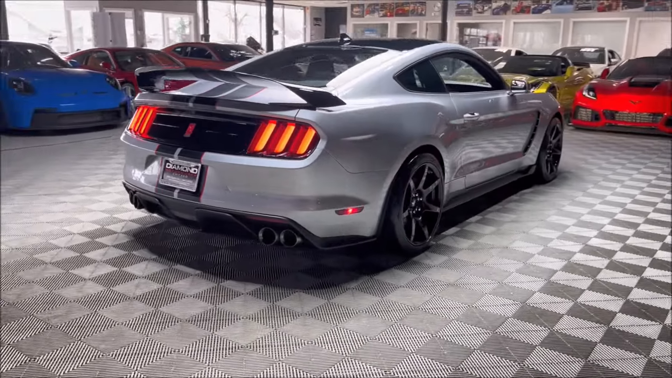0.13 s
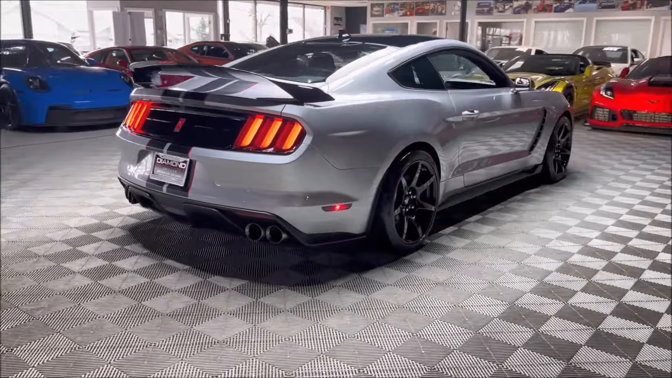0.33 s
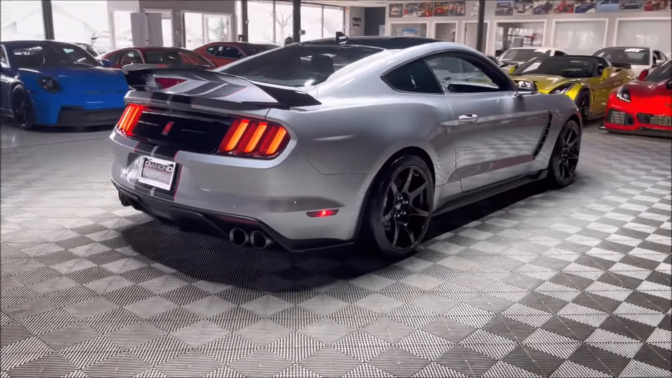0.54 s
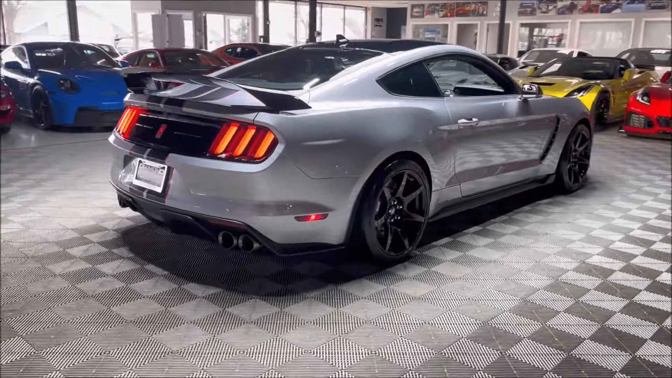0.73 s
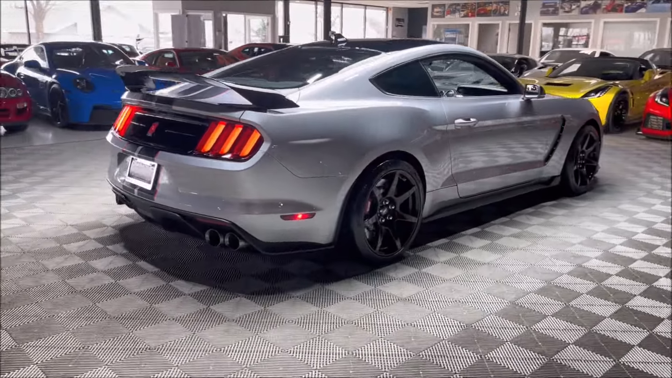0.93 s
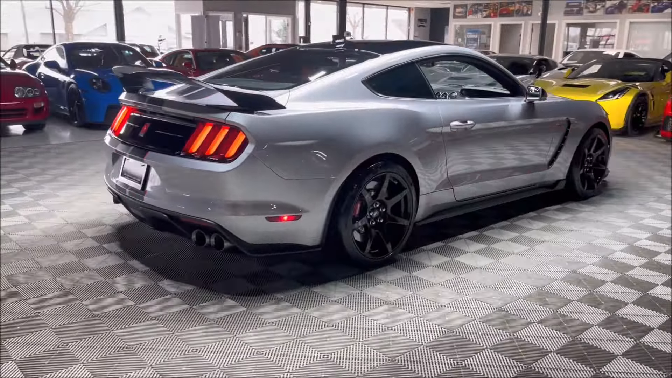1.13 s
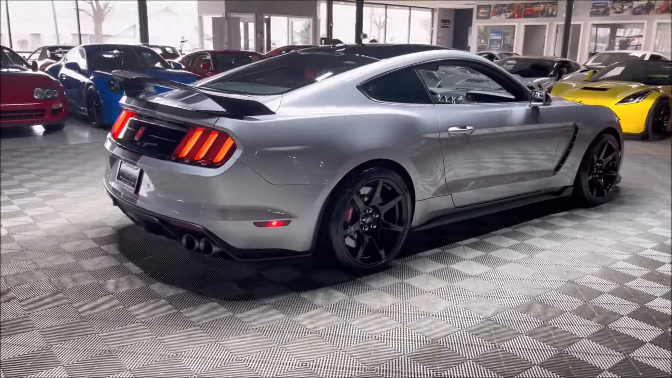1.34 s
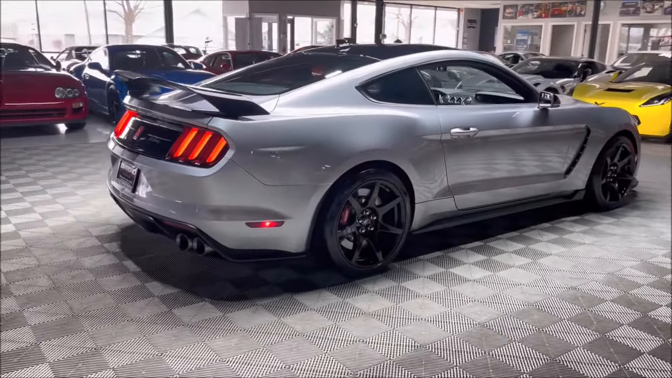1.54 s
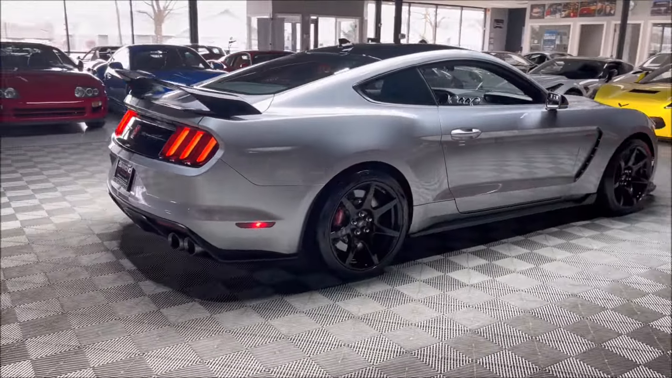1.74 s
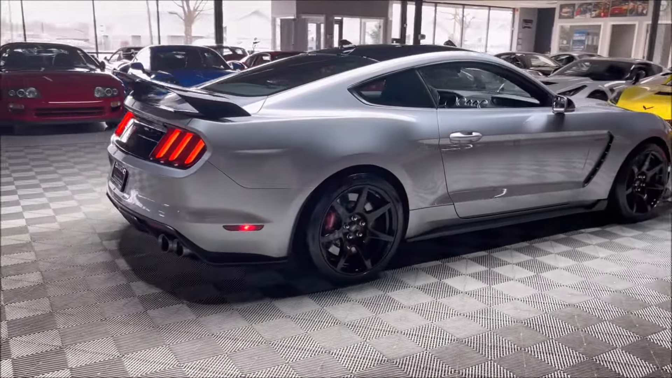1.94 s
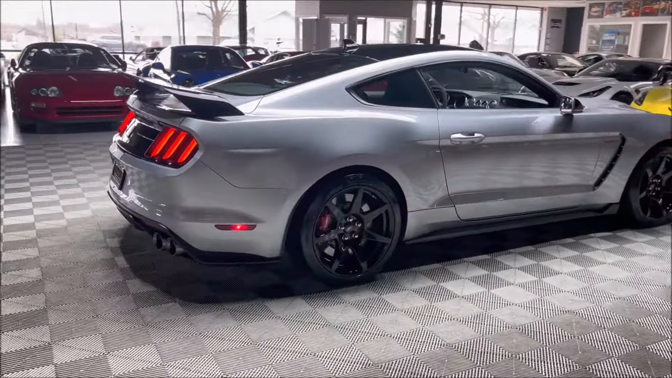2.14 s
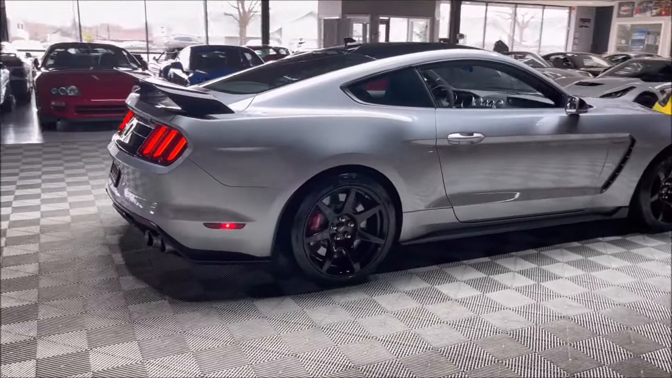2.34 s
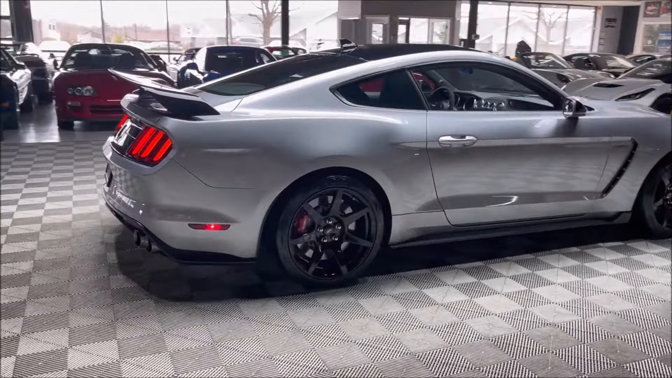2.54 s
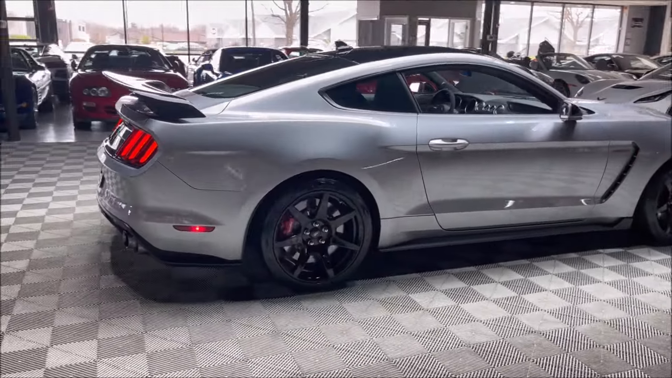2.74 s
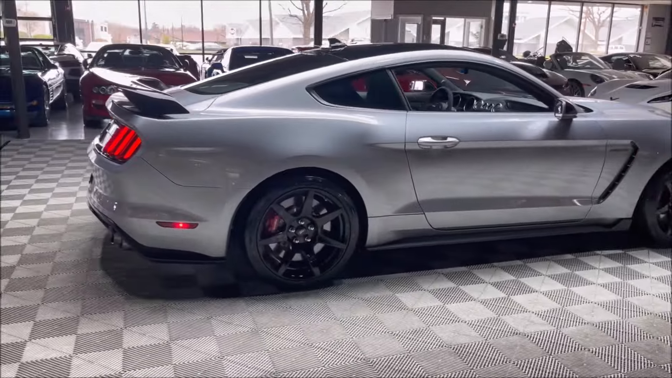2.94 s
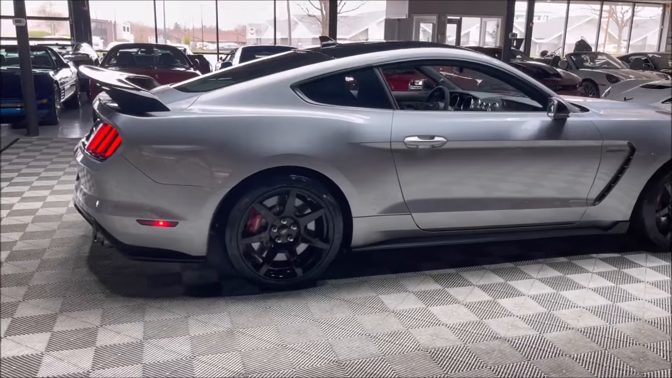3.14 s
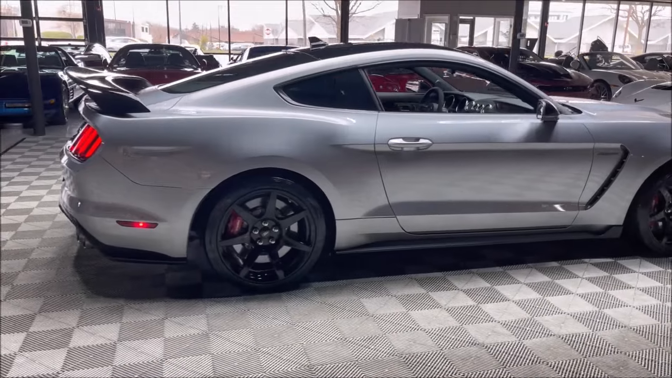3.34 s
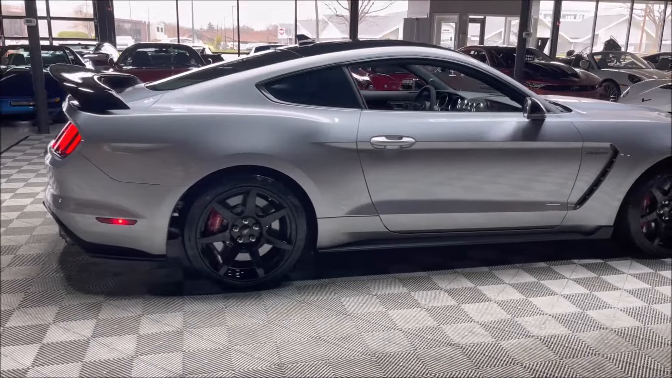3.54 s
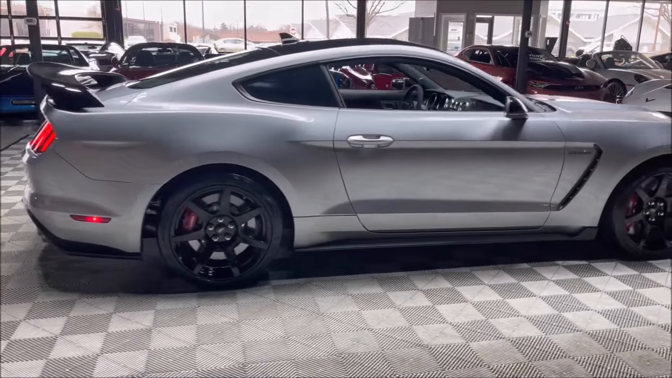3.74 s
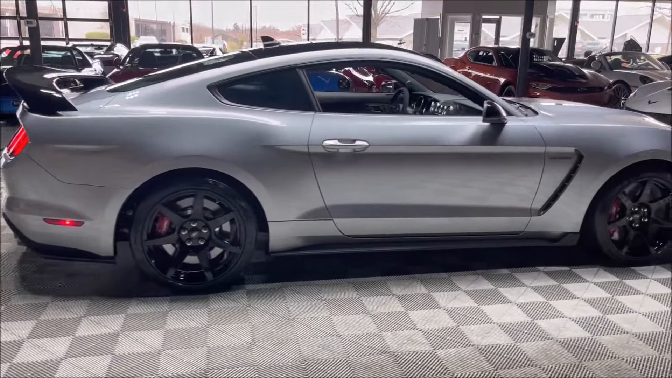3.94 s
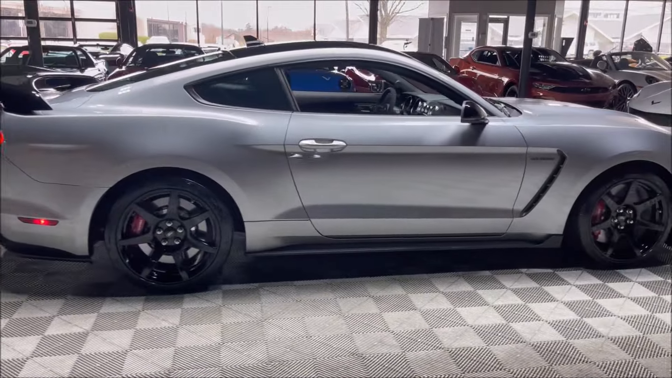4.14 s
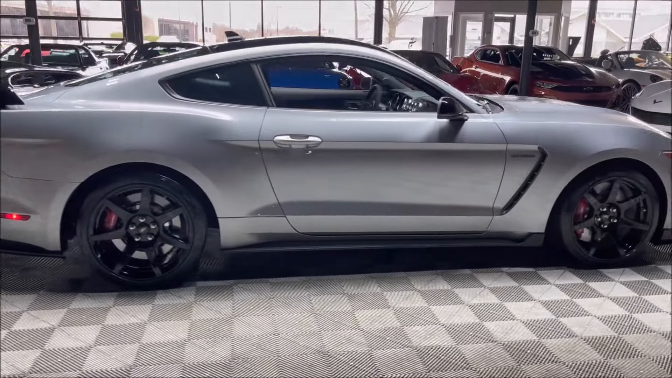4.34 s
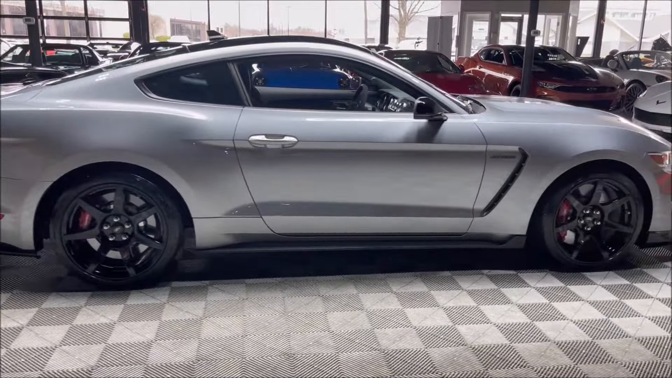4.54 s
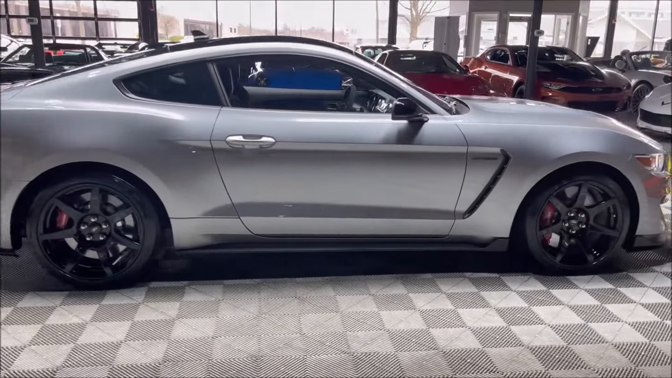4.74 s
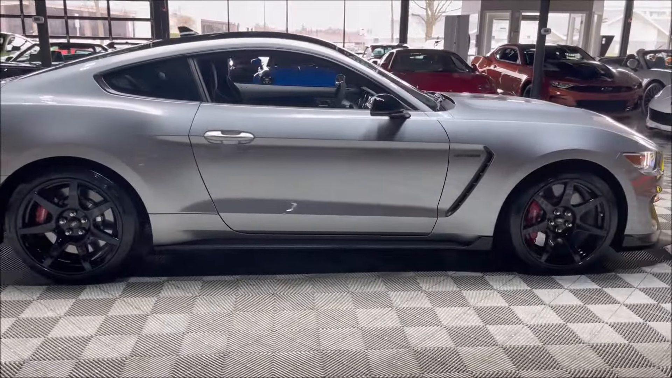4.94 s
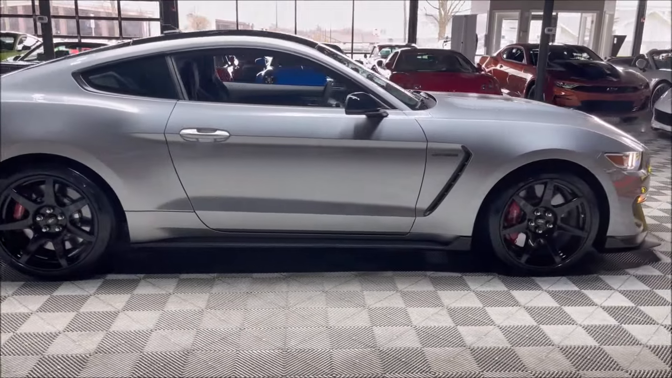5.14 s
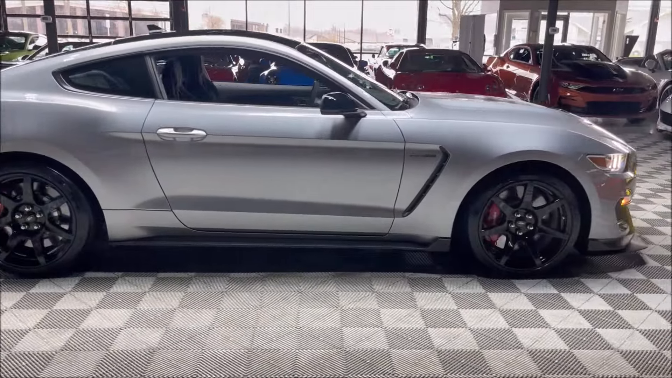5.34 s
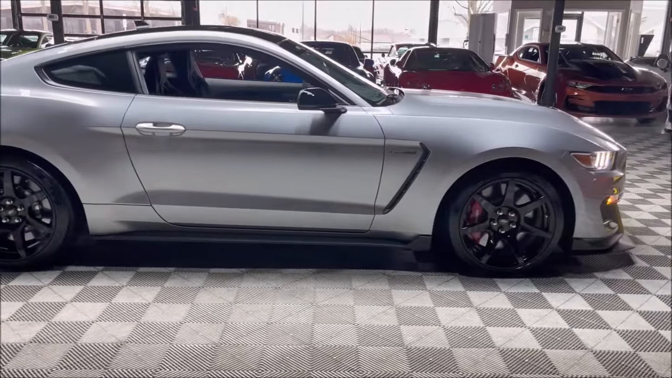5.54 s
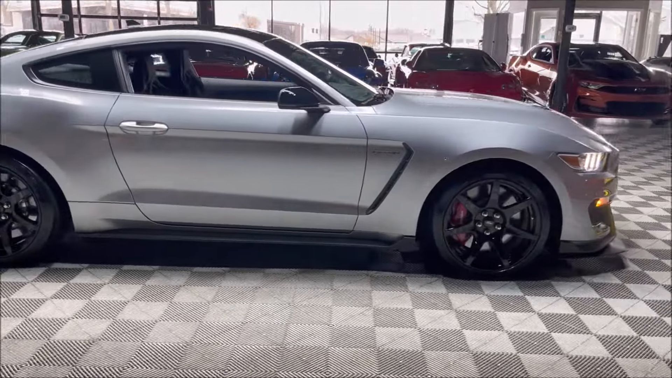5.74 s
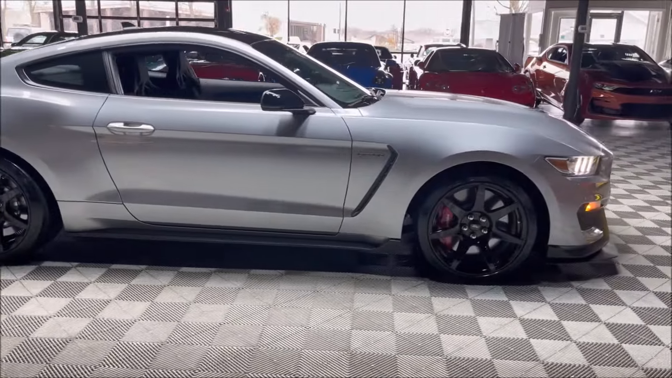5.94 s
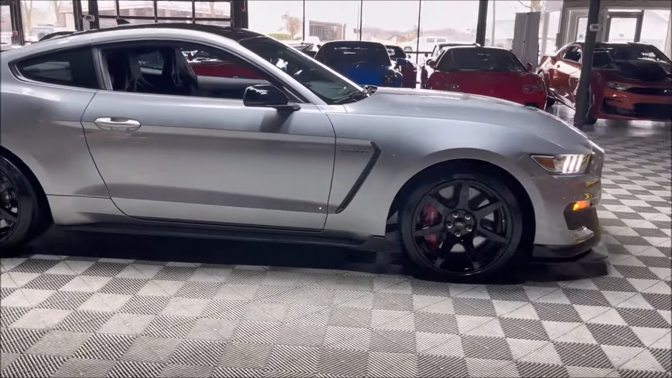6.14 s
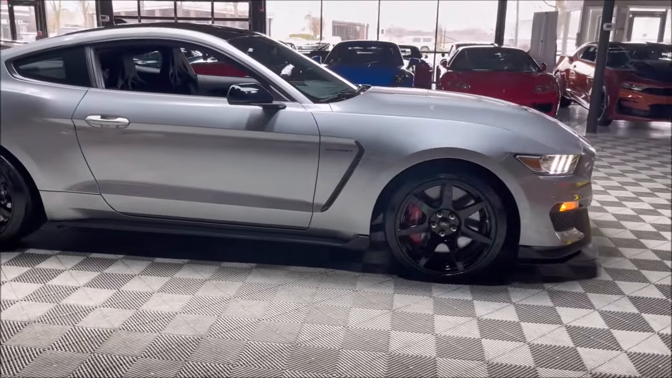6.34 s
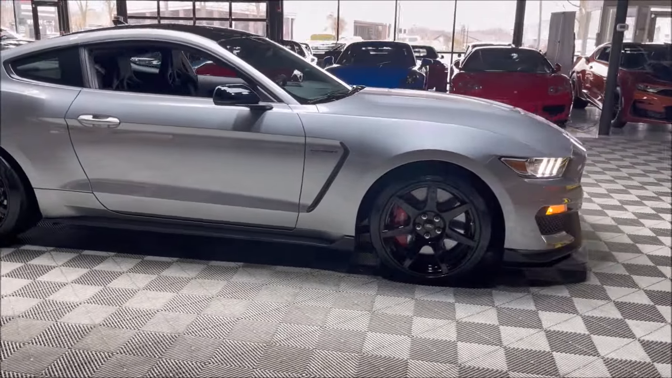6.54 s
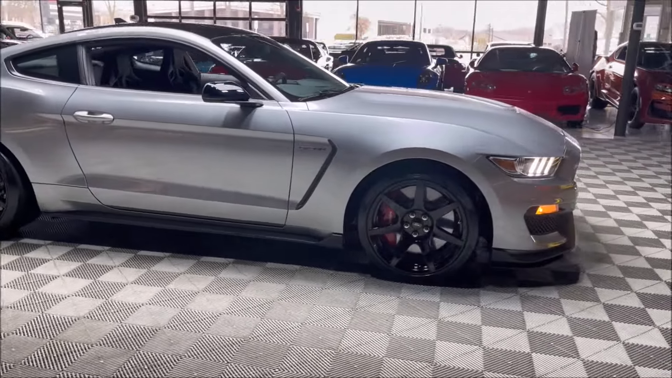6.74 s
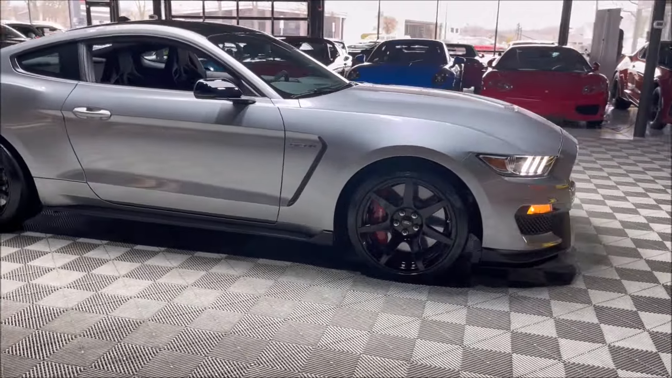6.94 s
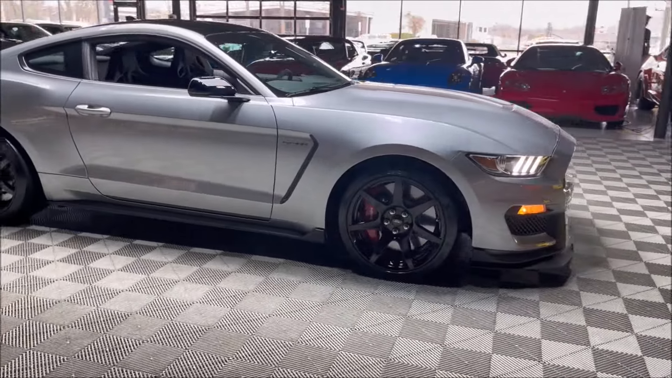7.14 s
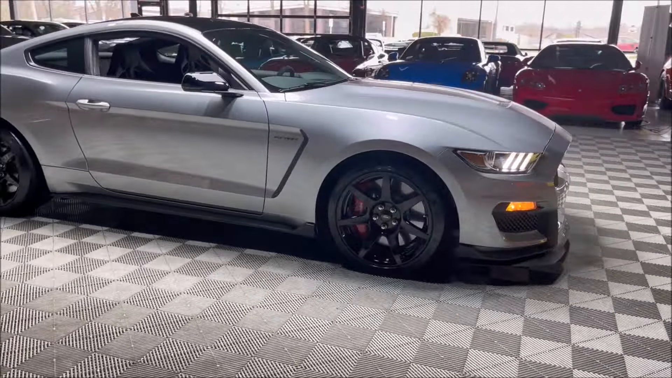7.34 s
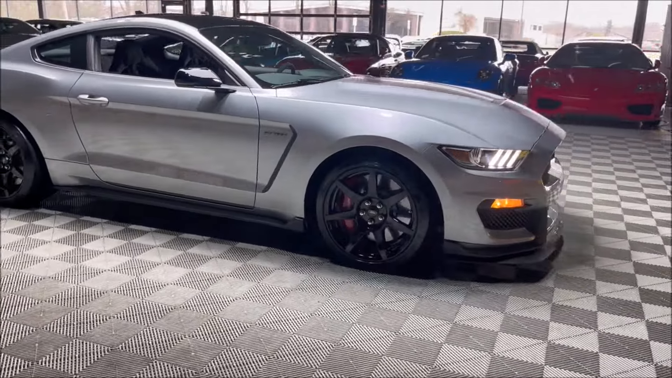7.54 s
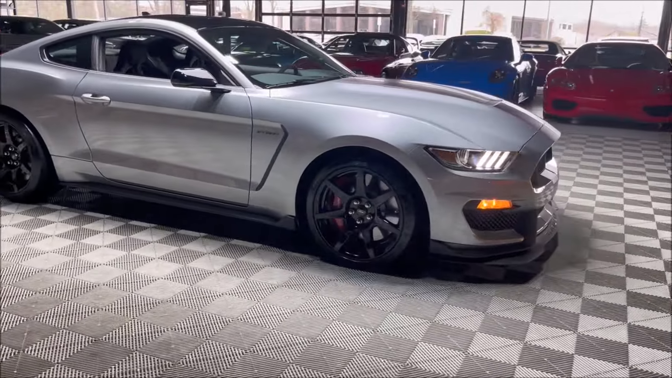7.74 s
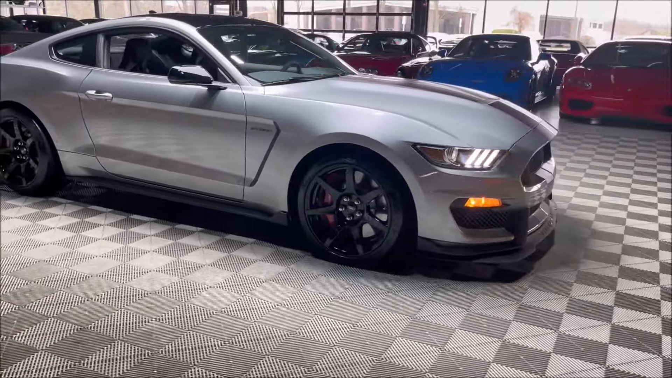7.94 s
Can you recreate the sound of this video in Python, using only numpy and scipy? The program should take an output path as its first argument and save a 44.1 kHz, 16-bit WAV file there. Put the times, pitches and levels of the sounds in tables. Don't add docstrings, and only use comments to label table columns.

```python
import sys
import numpy as np
from scipy import signal
from scipy.fft import rfft, irfft, next_fast_len
from scipy.io import wavfile
from scipy.ndimage import uniform_filter1d

SR = 44100
rng = np.random.default_rng(int(sys.argv[2]) if len(sys.argv) > 2 else 0)


def invert_db(x):
    u = np.asarray(x, float) / 20
    return 10 ** u


def generate_wav(sig):
    pcm = np.round(np.clip(np.atleast_2d(sig).T, -1, 1) * 32767).astype(np.int16)
    wavfile.write(sys.argv[1], SR, pcm)


N = 356328
STEP = 24
SILENCER_HZ = 119.8


def unit(x):
    return x / np.sqrt(np.mean(np.abs(x) ** 2))


def curves(table, at):
    first, *columns = np.transpose(table)
    return [np.interp(at, first, column) for column in columns]


def wander(rate, t, count):
    knots = rng.standard_normal((count, int(rate * N / SR) + 4))
    whole, part = np.divmod(t * rate, 1)
    whole = whole.astype(int)
    ease = np.pi / 4 * (1 - np.cos(np.pi * part))
    return knots[:, whole] * np.cos(ease) + knots[:, whole + 1] * np.sin(ease)


def places(usual, table, t):
    s, half, change = np.transpose(table)[:, :, None]
    return usual + (change * np.exp(-((t - s) / half) ** 2)).sum(axis=0)


def colour(x, shape):
    hz, db = np.transpose(shape)
    log_f = np.log(np.fft.rfftfreq(N, 1 / SR) + 1)
    return unit(irfft(rfft(x) * invert_db(np.interp(log_f, np.log(hz), db)), N))


def ports(first, second):
    # f/Hz, likeness [0-1], right leads by [half turns], left minus right/dB
    port_table = [(50, .999, 0, 0), (170, .98, -.03, 0), (400, .85, -.12, 1.3), (700, .55, -.2, 2),
                  (1300, .1, -.13, 1.8), (2200, .7, -.1, 1.5), (3500, .5, -.16, 1.5), (4700, .45, -.16, 4),
                  (5500, .45, .25, 3), (6900, .72, .55, 2), (7700, .96, .94, 0), (8200, .985, 1, 0),
                  (8800, .95, 1.06, 0), (9500, .8, 1.35, 0), (10500, .7, 1.65, 0), (11100, .998, 2, 0),
                  (13000, .998, 2, 0), (13600, .5, 2.6, 0), (14500, .99, 3, 0)]
    margin = 4096
    size = next_fast_len(N + 2 * margin)
    like, turn, lean_db = curves(port_table, np.fft.rfftfreq(size, 1 / SR))
    padding = ((0, 0), (margin, size - N - margin))
    padded = np.pad([first, second], padding, "reflect", reflect_type="odd")
    near, hall = rfft(padded * signal.windows.tukey(size, margin / size))
    left = near * invert_db(lean_db / 2)
    right = like * near + np.sqrt(1 - like ** 2) * hall
    right = right * np.exp(1j * np.pi * turn) * invert_db(-lean_db / 2)
    return irfft([left, right], size)[:, margin:margin + N]


def echoes(x, depth_db, rate):
    _, t, z = signal.stft(x, SR, nperseg=4096)
    ripple = wander(rate, np.minimum(t, N / SR), count=1025)
    ripple = np.repeat(ripple, 2, axis=0)[:2049]
    power = np.mean(invert_db(2 * depth_db * ripple))
    return signal.istft(z * invert_db(depth_db * ripple) / np.sqrt(power), SR, nperseg=4096)[1][:, :N]


def pipe_gains(k, rate, t):
    # f/Hz, width/Hz, level/dB, lag [cycles], second cylinder's share, its further lag [cycles]
    resonances = [(56.5, 8.9, -34.5, .9, 0.027, .5), (77.5, 36, -31, 0.2286, 0.87, .5),
                  (SILENCER_HZ, 40, -30.5, .47, .7, .5), (169, 24.7, -30.5, .36, .35, .5),
                  (235, 28.3, -35, .29, 0.26, .5), (290, 30, -35.5, .25, .8, .3),
                  (329, 19, -37, .64, 0.46, .55), (372, 14, -35.5, .7, 0.51, .5),
                  (432.5, 23, -46.5, .78, 0.13, .5), (311.5, 98, -43, .69, 0.055, 0.6),
                  (515.5, 45, -50, .38, 0.52, 0.62), (140, 5.5, -35.5, 0, 0.26, 0),
                  (657.5, 32, -48.5, .2, 0.71, .35), (749, 22, -53.5, .35, 0.61, .35)]
    # t/s, half length/s, change/dB
    standing_waves = [
        [(5.4, 0.58, 4.5)],
        [(4.2, 0.35, 2), (1.9, 1, -2.5)],
        [(0.43, 0.49, -2), (5.5, 0.97, 3.5), (3.2, 0.72, -6.5), (1.7, .3, 2)],
        [(.2, 0.34, -3), (1.7, 0.29, -8.5), (2.7, 0.22, 2), (4, 0.46, 2), (5.1, 0.33, -5), (6.7, 0.45, 3)],
        [(.2, .5, -7), (6.9, 0.54, -2.5), (7.8, 0.25, 1), (1, 0.28, 2.5), (2.25, 0.34, 4.5), (3.6, 0.53, 6),
         (4.7, 0.31, 6)],
        [(.2, .4, -3), (1.3, .3, -3.5), (2.4, 0.5, 3.5), (4, 1, 0), (5.7, .5, 3), (6.9, 0.33, -2.5)],
        [(.25, 0.29, 5), (1.5, 0.54, 6), (3.3, 0.74, 4), (4.8, 0.63, 5.5), (6.2, .3, 0)],
        [(3.2, 0.4, -4), (6.9, 0.97, -5)],
        [(.2, 1.2, 7.5), (3.7, 0.44, -7.5), (6.6, 0.98, 7)],
        [(1.2, 0.66, 5), (3.4, .6, 6), (4.8, 0.58, 8.5)],
        [(1.6, 1, 6), (3.6, 0.27, 4.5)],
        [(1.2, .6, 0.5), (5.9, 0.46, -5)],
        [(3.5, 0.83, 5.5)],
        [(1.8, 0.29, 1.5), (4.6, 1, 5)],
    ]
    # multiple [of the cycle rate], tail/dB, beside the doors/dB, nose/dB
    multiples = [(7, -48, -44, -42), (9, -37, -35, -36), (10, -37, -37, -34), (11, -45, -43, -43),
                 (12, -34, -30, -34), (13, -55, -58, -58), (14, -48, -45, -46), (15, -44, -51, -47),
                 (17, -49, -46, -43), (18, -35, -34, -32), (19, -45, -51, -45), (20, -41, -39, -37),
                 (21, -36, -37, -42), (22, -51, -54, -50), (23, -51, -53, -54), (25, -41, -39, -39),
                 (26, -41, -40, -38), (27, -39, -39, -39), (28, -45, -48, -52), (29, -53, -49, -49),
                 (30, -52, -48, -47), (31, -59, -55, -57), (32, -50, -48, -47), (33, -46, -41, -48),
                 (34, -37, -35, -42), (35, -43, -41, -44), (36, -43, -39, -47), (37, -47, -41, -46),
                 (38, -44, -44, -45), (39, -53, -50, -51), (40, -52, -49, -49), (41, -50, -47, -52),
                 (42, -40, -44, -42), (43, -53, -48, -51), (44, -47, -45, -47), (45, -39, -39, -47)]
    stations_s, lift_db = (1.5, 4., 6.3), .05
    f = k * rate
    centre, width, db, lag, twin, gap = np.transpose(resonances)[:, :, None]
    sweep = .025 + .1 * (centre == SILENCER_HZ)
    turn = 2 * k * lag + sweep * ((f - centre) / rate) ** 2
    two_cylinders = 1 + twin * np.exp(-2j * np.pi * k * gap)
    shape = np.exp(-1j * np.pi * turn) * two_cylinders / (1 + 2j * (f - centre) / width) ** 2
    shape = shape * (k != 8) * (k != 16) * (k != 24)
    swell = invert_db([places(d, waves, t) for d, waves in zip(db, standing_waves)])
    gains = (shape / np.linalg.norm(shape, axis=1, keepdims=True)).T @ swell
    order, *at = np.transpose(multiples)
    row = order.astype(int) - k[0]
    usual = np.sqrt(uniform_filter1d(np.abs(gains[row]) ** 2, int(4 * SR / STEP), axis=1))
    wanted_db = [np.interp(t, stations_s, dbs) + lift_db * n for n, dbs in zip(order, np.transpose(at))]
    gains[row] *= invert_db(wanted_db) / usual
    return gains


def exhaust(scatter, drift_rate, rough):
    # t/s, engine cycle rate f/Hz
    idle = [(0, 6.56), (.5, 6.585), (1.3, 6.69), (2.1, 6.745), (2.8, 6.645), (3.8, 6.645), (4.15, 6.54),
            (4.55, 6.72), (5.9, 6.73), (6.5, 6.69), (7.2, 6.655), (7.6, 6.595), (8.08, 6.53)]
    # t/s, level/dB
    drone = [(0, -7.5), (2.4, -8.5), (3.3, -10.5), (3.9, -13), (4.15, -18), (4.28, -24.5), (4.4, -22.5),
             (4.58, -35.5), (4.68, -19), (4.85, -11.5), (5.28, -16.2), (5.53, -14.5), (5.78, -18),
             (5.93, -31), (6.03, -22.5), (6.55, -20), (6.9, -13.5), (8.08, -11.5)]
    # t/s, half length/s, change/dB
    octave_places = [(.75, 0.5, 9.4), (1.8, 0.75, 12), (3.1, 0.42, 7.3), (5.1, 0.56, 6.8),
                     (6.3, 0.73, 21.4), (7.6, 0.69, 15)]
    third_places = [(.2, 0.6, 14.5), (2.7, .5, 12), (3.9, 0.66, 14), (6.2, .5, 4), (7.8, 0.5, 10)]
    # t/s, half length/s, change [share]
    flank = [
        (1, .5, .3),
        (3.5, 1.6, -.2),
        (6.6, 1.2, .3),
    ]
    t = np.arange(N // STEP + 1) * STEP / SR
    (hz,), (drone_db,) = curves(idle, t), curves(drone, t)
    cycle = np.cumsum(hz) * STEP / SR
    k = np.arange(7, 122)
    gain = pipe_gains(k, hz.mean(), t) * np.exp(2j * np.pi * k[:, None] * cycle)
    re, im = wander(drift_rate, t, count=2 * len(k)).reshape(2, len(k), -1)
    scatter = places(scatter, flank, t) * np.clip(k[:, None] / 40, .35, 1)
    firing = 1 + rough * wander(50., t, count=2)
    lines = invert_db(drone_db) * np.cos(2 * np.pi * (8 * cycle - .05))
    lines += invert_db(places(-44.5, octave_places, t)) * np.cos(2 * np.pi * (16 * cycle - .5))
    lines += invert_db(places(-46.5, third_places, t)) * np.cos(2 * np.pi * (24 * cycle - .4))
    scattered = gain * (1 + scatter * (re + 1j * im)) / np.sqrt(1 + 2 * scatter ** 2)
    first = scattered.sum(axis=0).real * firing[0] + lines
    second = (gain * (im + 1j * re[::-1])).sum(axis=0).real * firing[1] / np.sqrt(2)
    first, second = (signal.resample_poly(v, STEP, 1)[:N] for v in (first, second))
    return np.sqrt(2) * ports(first, second), np.interp(np.arange(N) / SR, t, cycle)


def rustle(cycle, puff, uneven_db, flicker_db, hall_db):
    # f/Hz, level/dB per Hz
    roar_shape = [(60, -21), (120, 2.5), (250, 9), (400, 2.5), (580, 0), (760, -0.5), (950, -1.5),
                  (1080, -4.5), (1180, -10.5), (1350, -14.5), (1600, -47.5)]
    tail_shape = [(900, -45), (1250, -14.5), (1450, 0.5), (1800, -2.5), (2100, -6.5), (2550, -12),
                  (2900, -9), (3300, -13.5), (3900, -21), (4800, -27.5), (6000, -57)]
    bay_shape = [(900, -41.5), (1250, -5), (1600, -1.5), (1720, 1), (1850, -2.5), (2100, -2.5), (2350, -7),
                 (2750, -5), (3200, -6.5), (3400, -8.5), (3900, -12.5), (4300, -31), (6000, -54.5)]
    hiss_shape = [(2500, -37.5), (3800, -2), (4200, -1.5), (5200, -2.5), (6000, -5.5), (7000, -3),
                  (8500, -0.5), (10000, -5), (10800, -10.5), (13000, -14.5), (15000, -18.5), (15800, -26.5),
                  (16500, -44.5)]
    whistle_shape = [(9600, -26), (9950, -2.5), (10250, -2.5), (10600, -24)]
    # t/s, half length/s, change/dB
    whistle_places = [(3.2, .5, 3), (6.1, .6, 5), (7.8, .6, -1.5)]
    # t/s, half length/s, change/dB
    doors = [(3.601, 1.2, -1.8)]
    t = np.arange(N) / SR
    uneven = np.cos(2 * np.pi * (cycle - .4)) + np.cos(2 * np.pi * (2 * cycle - .8))
    gate = invert_db(uneven_db * uneven) * (1 + puff * np.cos(2 * np.pi * (8 * cycle - .3)))
    band = signal.butter(4, [450, 1300], "band", fs=SR, output="sos")
    way = np.pi / 2 * np.clip((t - 1.5) / 4.24, 0, 1)
    levels_db = ((-38, -41), (-45.95, -45.95), (-56, -54.5))
    gas_db, bay_db, gear_db = (a + (b - a) * np.sin(way) ** 2 for a, b in levels_db)
    bay_db = places(bay_db, doors, t)
    whistle_gain = invert_db(places(-14.5, whistle_places, t)) * np.sin(way)
    pair = []
    for _ in range(2):
        flicker = invert_db(flicker_db * wander(20., t, count=3))
        shapes = (roar_shape, tail_shape, bay_shape, hiss_shape, whistle_shape)
        gas, tail, nose, gear, whistle = (colour(rng.standard_normal(N), s) for s in shapes)
        gear = gear + whistle_gain * whistle
        bay = tail * np.cos(way) + nose * np.sin(way)
        gas = gas / np.std(signal.sosfilt(band, gas))
        parts = gas * flicker[0] * invert_db(gas_db)
        parts += bay * flicker[1] * invert_db(bay_db)
        parts += gear * flicker[2] * invert_db(gear_db)
        pair.append(gate * parts)
    return ports(*echoes(np.array(pair), hall_db, rate=1.5))


def pump(fade_s):
    # f/Hz, level/dB
    whine = [(9545, -83), (9652, -82)]
    t = np.arange(N) / SR
    tones = sum(invert_db(db) * np.sin(2 * np.pi * hz * t) for hz, db in whine)
    return tones / (1 + (t / fade_s) ** 6)


def metal_ring(hz, t60, rise_s):
    t = np.arange(2048) / SR
    return np.sin(2 * np.pi * hz * t) * 1000. ** (-t / t60) * (1 - np.exp(-t / rise_s))


def rattle(cycle, base_db, scatter_db):
    # f/Hz, t60/s, level/dB
    tips = [(2810, .014, 3), (2950, 0.015, 4), (1420, 0.01, -14.5), (5160, 0.016, -20), (9350, .01, -21.5)]
    fade_db_s = 7.5
    hit = np.flatnonzero(np.diff(np.floor(8 * cycle - .1)))
    db = base_db + scatter_db * rng.standard_normal(len(hit)) - fade_db_s * hit / SR
    size = invert_db(db[:, None] + 1.9 * rng.standard_normal((len(hit), len(tips))))
    out = np.zeros(N)
    for (hz, t60, mode_db), share in zip(tips, size.T):
        impulses = np.zeros(N)
        impulses[hit] = share * invert_db(mode_db)
        out += signal.fftconvolve(impulses, metal_ring(hz, t60, rise_s=.0019))[:N]
    return out


def add_ring(out, s, hz, db, t60):
    start = int(s * SR)
    out[start:start + 2048] += invert_db(db) * metal_ring(hz, t60, rise_s=.0008)


def tip_knocks():
    # t/s, peak level/dB, f/Hz
    knocks = [(0.0338, -41, 2870), (0.0747, -46.5, 2650), (0.0892, -43, 2700), (0.1291, -38, 2880),
              (0.1595, -46.5, 2810), (0.19, -45, 2710), (0.2049, -42, 2890), (0.2269, -43, 2870),
              (0.2418, -42, 2820), (0.2838, -44, 2800), (0.3197, -45, 2920), (0.3396, -40, 2760),
              (0.3571, -39, 2890), (0.3945, -37, 2870), (0.4354, -46, 2860), (0.4713, -46, 2970),
              (0.5087, -44, 2870), (0.5317, -47, 3080), (0.5856, -35.5, 2740), (0.6419, -45, 2750),
              (0.6589, -44, 3030), (0.6973, -41, 2830), (0.7552, -47, 2940), (0.7746, -42, 3050),
              (0.8111, -40, 2750), (0.8869, -44, 3030), (0.9482, -43, 2790), (0.9607, -40, 2800),
              (1.1373, -50, 2890), (1.1603, -46, 2790), (1.1852, -46, 2780), (1.2421, -46.5, 2680),
              (1.259, -44, 2900), (1.3384, -47, 2700), (1.4845, -49, 3020), (1.5105, -48, 2940)]
    out = np.zeros(N)
    for s, db, hz in knocks:
        add_ring(out, s, (hz + 2950) / 2, db + 6, t60=.02)
    return out


def valve(bright_db, dull_db):
    # t/s, bright part level/dB, dull part level/dB
    clicks = [(0.1092, -51, -43.5), (0.2632, -49, -45), (0.3386, -52, -43), (0.4155, -54, -47),
              (0.4903, -54, -43), (0.5676, -53, -44), (0.642, -55, -38), (0.7163, -54, -37),
              (0.7934, -53, -40), (0.8684, -52, -42), (0.9278, -54, -43), (1.0176, -52, -45),
              (1.0909, -54, -47), (1.1677, -50, -43), (1.3169, -51.5, -44.5), (1.4022, -54, -42),
              (1.483, -50, -46), (1.6202, -53, -47), (1.6901, -54, -44.5), (1.9116, -52, -43),
              (1.973, -52, -40), (2.0582, -54, -43), (2.2034, -57, -43), (2.2835, -55, -41)]
    out = np.zeros(N)
    detune = 1 + .05 * rng.standard_normal((len(clicks), 2))
    for (s, db, low_db), off in zip(clicks, detune):
        add_ring(out, s, 5000 * off[0], db + bright_db, t60=.02)
        add_ring(out, s, 1505 * off[1], low_db + dull_db, t60=.04)
    return out


def ticks(tail_s, tail_db):
    # t/s, peak level/dB, low part level/dB
    cracks = [(0.3556, -39, -40), (1.839, -29, -51), (2.918, -39.5, -47.5), (3.055, -33, -46),
              (5.7495, -23, -42), (5.757, -31, -50), (6.0487, -36.5, -51), (6.2641, -24.5, -40),
              (6.889, -31.5, -46), (6.909, -24.5, -40), (7.5655, -26.5, -44), (7.568, -22.5, -42)]
    t, out = np.arange(4096) / SR, np.zeros(N + 4096)
    high = signal.butter(4, [10200, 14300], "band", fs=SR, output="sos")
    low = signal.butter(4, [2990, 5400], "band", fs=SR, output="sos")
    for s, peak_db, low_db in cracks:
        breath = np.exp(-t / tail_s) * rng.standard_normal(4096)
        push = (t == 0) + invert_db(tail_db) * breath
        crack = invert_db(peak_db) * signal.sosfilt(high, push) + invert_db(low_db) * signal.sosfilt(low, push)
        out[int(s * SR):int(s * SR) + 4096] += crack
    return out[:N]


def scene():
    # t/s, half length/s, change/dB
    pan_sways = [(3.8, 0.56, 0.5), (4.4, 0.13, 0), (5, 0.81, 1), (6.4, 0.15, -2.5)]
    pipes, cycle = exhaust(scatter=.4, drift_rate=1.2, rough=.08)
    pan_db = places(1.0, pan_sways, np.arange(N) / SR)
    lean = invert_db(np.array([pan_db, -pan_db]) / 2)
    noise = rustle(cycle, puff=.13, uneven_db=.23, flicker_db=.79, hall_db=2.5)
    hits = pump(fade_s=2.2) + rattle(cycle, base_db=-47.0, scatter_db=3.0)
    hits += tip_knocks() + valve(bright_db=7.0, dull_db=8.0)
    late_hits = np.roll(hits, 300)
    return pipes * lean + noise + ports(hits, late_hits) + ticks(tail_s=.003, tail_db=-19.0)


def band_limit(x):
    return signal.sosfilt(signal.butter(12, 15700, fs=SR, output="sos"), x)


def record(dry):
    return band_limit(dry)


dry = scene()
out = record(dry)
generate_wav(out)
```